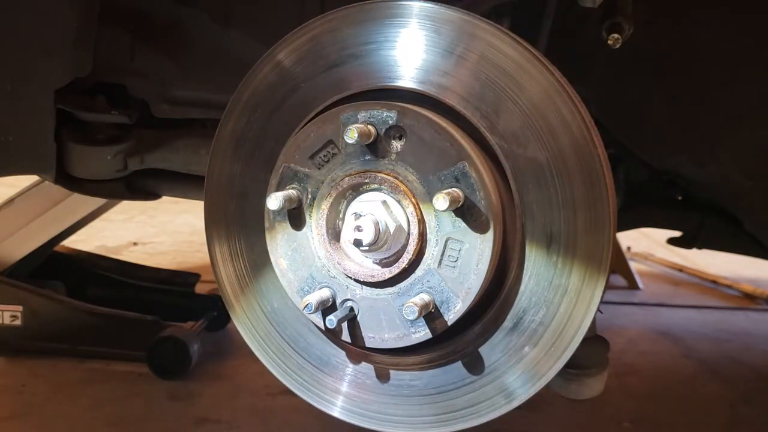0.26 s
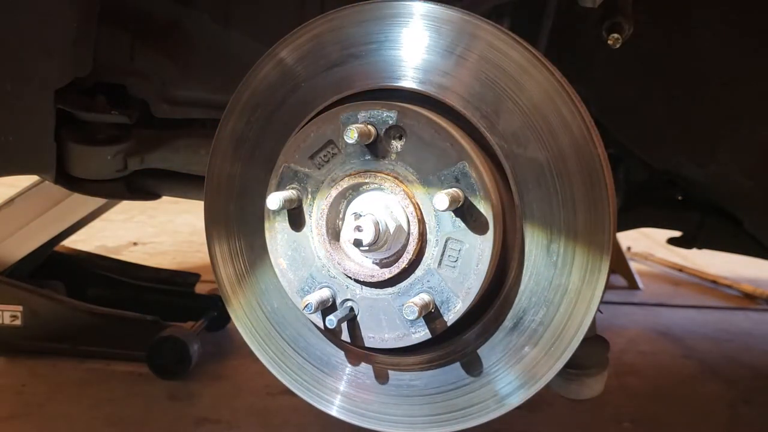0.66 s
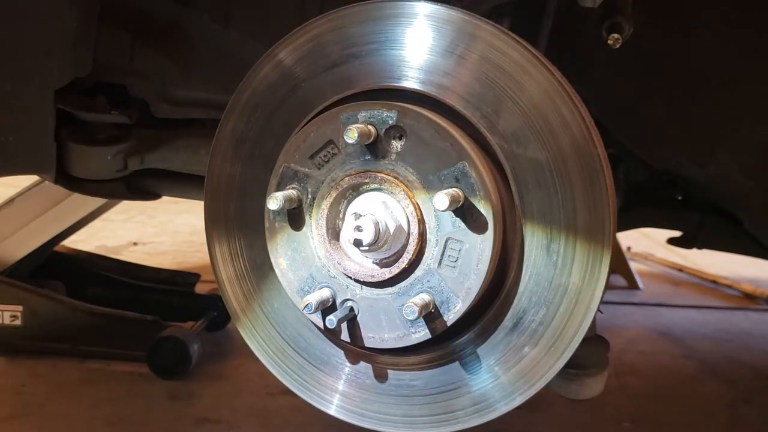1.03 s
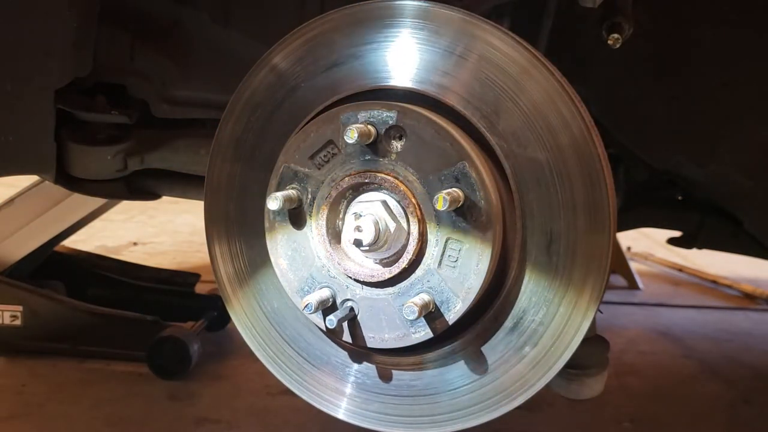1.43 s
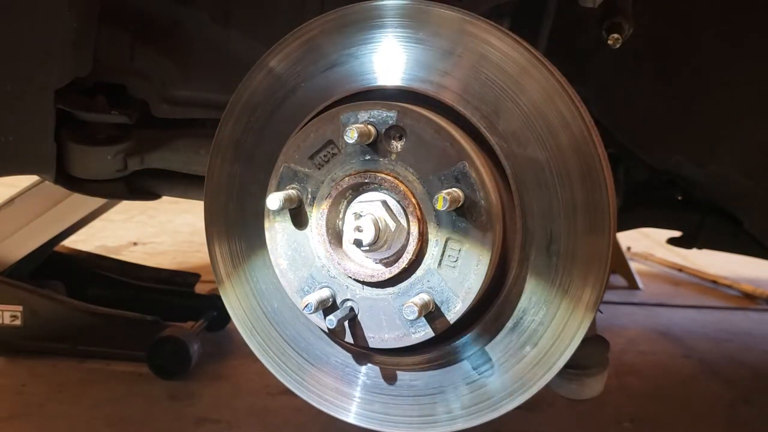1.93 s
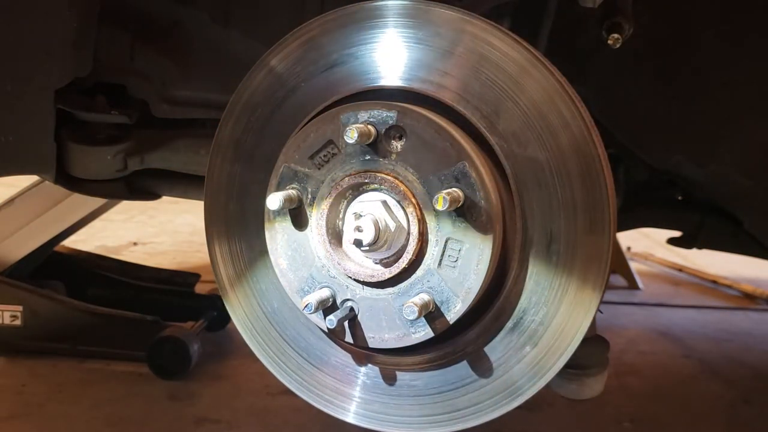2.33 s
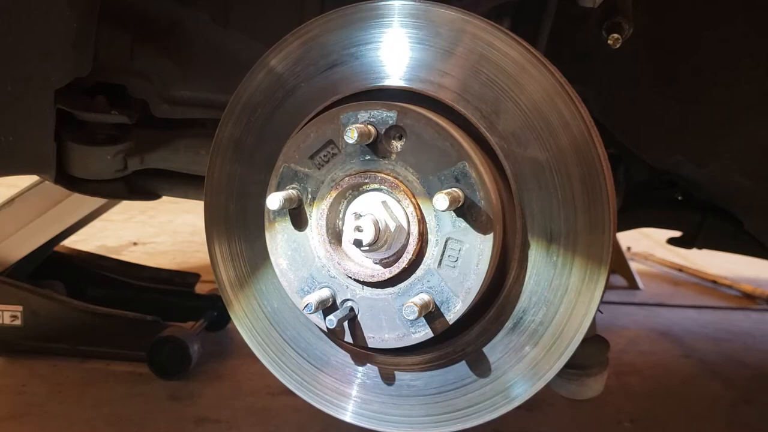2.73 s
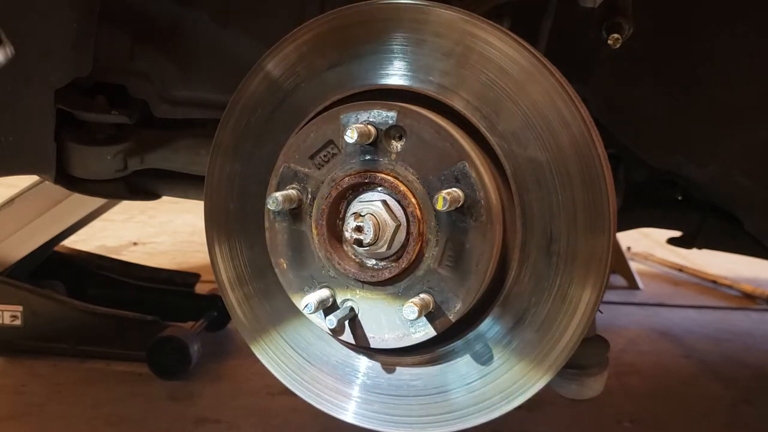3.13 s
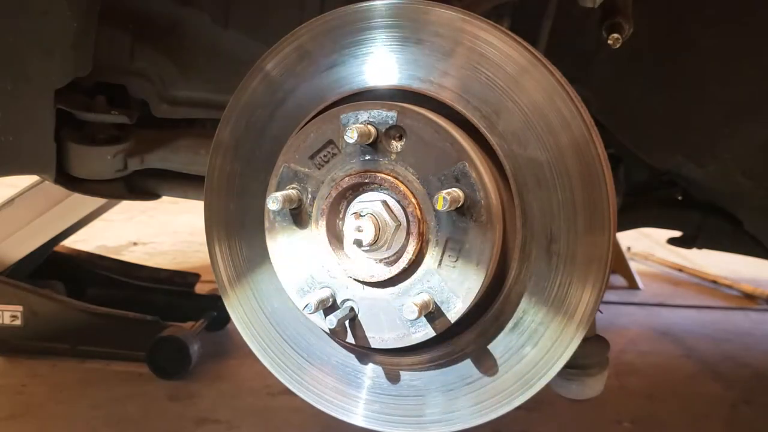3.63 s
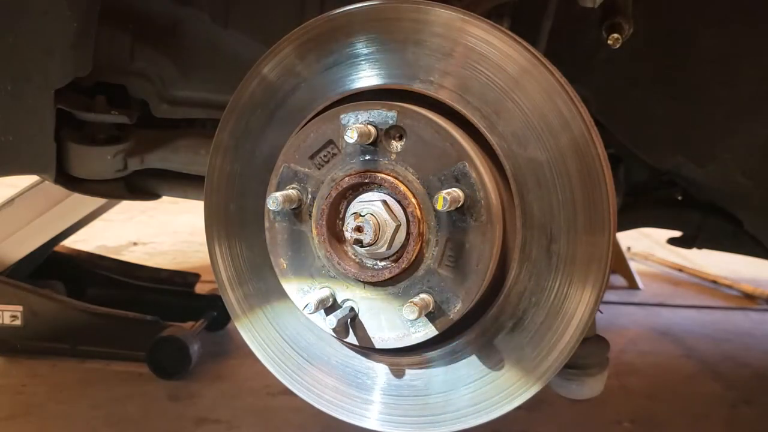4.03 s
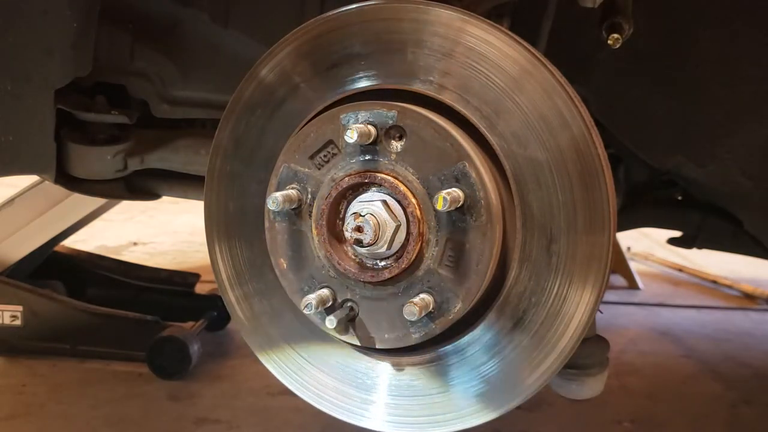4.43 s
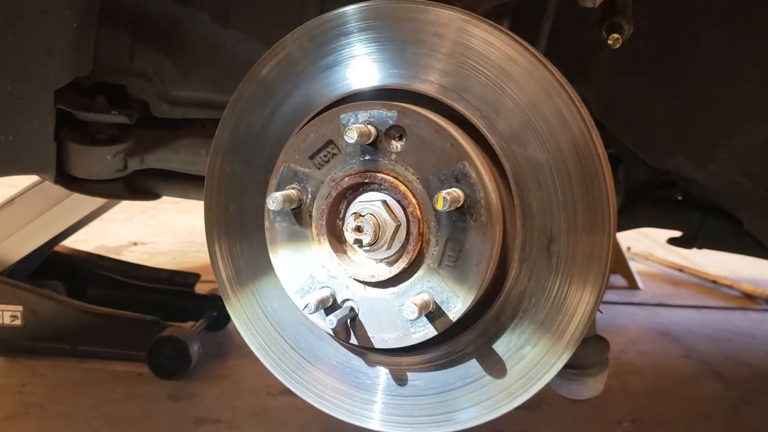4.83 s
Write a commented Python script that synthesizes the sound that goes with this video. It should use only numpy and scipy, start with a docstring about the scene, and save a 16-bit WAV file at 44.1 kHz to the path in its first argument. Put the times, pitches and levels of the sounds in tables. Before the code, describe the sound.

A steel hand tool is knocked on a concrete garage floor, twice early, then seven quick clattering blows, ringing over faint traffic.

```python
"""The ring of a blow just struck dies away over far traffic; then a steel hand tool is knocked on a concrete
garage floor, left of a camera. Every blow is a chatter of contacts, repeated once by a far wall: noisy bursts
of force drive the resonances of head, shank and slab, and the bare garage answers with diffuse noise and
standing waves. Sleeves rustle close on the left as grainy noise; a small steel part clinks once, in three
contacts; filtered noise and two wavering engine notes make the traffic."""
import sys
import numpy as np
from scipy import signal
from scipy.fft import rfft, irfft, next_fast_len
from scipy.io import wavfile
from scipy.ndimage import uniform_filter1d, map_coordinates

SR = 44100
rng = np.random.default_rng(int(sys.argv[2]) if len(sys.argv) > 2 else 0)


def dump_mix(stems):
    """Bounce the given channels to the path in sys.argv[1] as a 16-bit WAV at rate SR."""
    frames = np.atleast_2d(stems).T  # one column per channel
    limited = np.clip(frames, -1, 1)  # hard clip at full scale
    pcm = np.round(limited * 32767).astype(np.int16)
    wavfile.write(sys.argv[1], SR, pcm)


N = 223145
LEAD = 11025  # samples computed ahead of time zero, for the blow that is only heard ringing out

# Blows of the tool on the floor; the first falls before time zero. Each row: start in seconds, strength in dB;
# then in dB over the strength: graze just before, first touch, late rattle, knock of the slab, boom of the slab,
# clack of the shank, 13 kHz ring of the head; then left over right in dB, slap from the far wall in dB over the
# strength, time from first touch to full blow in seconds, push of the floor on the camera in dB before the
# share of each port.
BLOWS = [(-.16, -10.5, -46, -2, -3.5, -11, -11, -5.5, 1.5, 2, -2, .0035, -60),
         (1.357, -11, -38, -1, -6, -9, -10.5, -5.5, -1.5, 1.1, 0.5, 0.0038, -52),
         (1.668, -7.5, -45.5, -9.5, 0.5, -11, -12, -8.5, -21.5, 2.3, -2, .0022, -57),
         (3.3024, -5, -17, -3.5, 0, -12.5, -16, -9.5, -3, 3.37, 1, 0.0032, -44),
         (3.6144, -9, -40, -2.5, 2.5, -7.5, -12, -7, 1.5, 6.4, 2.5, .0034, -43),
         (3.874, -11, -40, -3, 3.5, -8, -11.5, -7, 4, 7.1, 4.5, 0.0034, -41),
         (4.114, -8, -34, -9.5, 1.5, -10, -13.5, -8.5, 1, 5.1, 0, .0024, -45),
         (4.3399, -7, -36, -3.5, 0.5, -9, -15.5, -10.5, -2.5, 2.6, -1, 0.0029, -41),
         (4.5712, -6.5, -49, -0.5, -0.5, -8.5, -15.5, -10.5, 1, 4, -11, .0038, -43.5),
         (4.807, -12.5, -40, -2, 6, -13, -15, -8.5, 0.5, 4.5, 8, 0.0027, -38)]


def amp(db):
    """Level is logarithmic: 20 dB is a factor of ten in amplitude."""
    return 10 ** (np.asarray(db) / 20)


def unit(x):
    """Normalisation by effective value: the signal is scaled to rms 1."""
    return x / np.sqrt(np.mean(x ** 2) + 1e-20)


def along(points, hz):
    """Spectra are drawn over logarithmic frequency: straight lines join the (Hz, value) points."""
    f, v = np.transpose(points)
    return np.interp(np.log(hz + 1), np.log(f + 1), v)


def curves(rows):
    """Slow change is piecewise linear in time: one curve for each column after the seconds."""
    s, *cols = np.transpose(rows)
    return [np.interp(np.arange(N) / SR, s, c) for c in cols]


def wobble(rate):
    """Band-limited fluctuation: a smooth curve through random knots, rate of them a second."""
    knots = rng.standard_normal(int(N * rate / SR) + 4)
    return map_coordinates(knots, [np.arange(N) * rate / SR])


def filtered(x, response):
    """Linear filtering: the spectrum of x is multiplied by a response of frequency in Hz."""
    m = next_fast_len(x.shape[-1] + 8192)
    spectrum = rfft(x, m) * response(np.fft.rfftfreq(m, 1 / SR))
    return irfft(spectrum, m)[..., :x.shape[-1]]


def pair(length, alike, spectrum=((1, 0),)):
    """Interchannel coherence: sum and difference of two noises, weighted by likeness; the pair has rms 1."""
    def gain(hz):
        turn = np.arccos(np.clip(along(alike, hz), -1, 1)) / 2
        return amp(along(spectrum, hz)) * [np.cos(turn), np.sin(turn)]

    mid, side = filtered(rng.standard_normal((2, length)), gain)
    return unit(np.array([mid + side, mid - side]))


def body(modes, bed):
    """Modal response: resonances on a broad noise bed, made minimum-phase by its cepstrum, with energy 1."""
    hz = np.fft.rfftfreq(8192, 1 / SR) + 1
    power = amp(2 * along(bed, hz))
    for centre_hz, width_hz, db in modes:
        power = power + amp(2 * db) / (1 + (2 * (hz - centre_hz) / width_hz) ** 2) ** 2
    cepstrum = irfft(np.log(power + 1e-12) / 2)
    cepstrum[1:4096] *= 2  # folding the later half onto the earlier makes the response causal
    cepstrum[4097:] = 0
    ring = irfft(np.exp(rfft(cepstrum)))[:4096]
    return ring / np.linalg.norm(ring)


def strike(times, levels_db, pans_db, t60, own):
    """Contact excitation: scraping noise bursts, partly shared; own is the share of power private to a port."""
    out, t = np.zeros((2, N + LEAD + 2048)), np.arange(2048) / SR
    later = 6  # samples by which the right port hears a contact after the left
    shape = amp(-60 * t / t60) * (1 - np.exp(-t / 0.0011))
    grit = rng.standard_normal((len(times), 3, len(t)))
    for s, db, pan_db, (shared, left, right) in zip(times, levels_db, pans_db, grit):
        burst = shape * (np.sqrt(1 - own) * shared + np.sqrt(own) * np.array([left, right]))
        burst *= np.linalg.norm(shape) / np.linalg.norm(burst, axis=1, keepdims=True)
        i = round(s * SR) + LEAD
        out[0, i:i + len(t) - later] += amp(db) * burst[0, :-later]
        out[1, i + later:i + len(t)] += amp(db - pan_db) * burst[1, :-later]
    return out[:, :N + LEAD]


def garage(force, near_db, far_db):
    """Diffuse reverberation: contact energy lingers as noise; near walls answer fast, the whole room slowly."""
    # Each row: frequency in Hz, decay time t60 in seconds.
    room_decay = [(60, 0.45), (160, 1), (420, 1), (1100, 1), (2900, 1), (6000, 0.84), (9000, 0.61),
                  (13000, 0.42), (15600, 0.35), (16000, .04)]
    # Each row: frequency in Hz, left-right likeness.
    echo_alike = [(60, 0.81), (180, 0.94), (550, 0.3), (1650, 0.25), (4970, -0.014), (15000, -0.24)]
    window, hop = 256, 64  # samples
    frames = dict(nperseg=window, noverlap=window - hop)
    hz, t, noise = signal.stft(pair(N + LEAD, echo_alike), SR, **frames)
    frame_of_sample = np.arange(N + LEAD) // hop + 1
    energy = np.bincount(frame_of_sample, force[0] ** 2, len(t))[None, :len(t)]

    near = amp(2 * near_db - 120 * t / 0.2) * (1 - np.exp(-(t / 0.015) ** 2))
    t60 = along(room_decay, hz)[:, None]
    far = amp(2 * far_db - 120 * t / t60) * (1 + 1.1 * np.exp(-t / 0.017))
    # most of the room answers only after a trip to the far wall
    arrival = 0.28 + 0.56 / (1 + np.exp(-(t - .03) / .003))
    lingering = np.abs(signal.fftconvolve(energy, near + far * arrival, axes=1)[:, :len(t)])

    # the diffuse tail is uneven: random smooth patches over time and frequency raise and lower it
    patches = uniform_filter1d(rng.standard_normal(lingering.shape), 2, 0)
    patches = unit(uniform_filter1d(patches, 60, 1))
    echo = noise * amp(1.8 * patches) * np.sqrt(lingering)
    return signal.istft(echo, SR, **frames)[1][:, :N + LEAD] * amp([[0], [-3.5]])


def sounded(force, ring, near_db=-36, far_db=-40):
    """Source-filter principle: force, direct and by way of the garage, convolved with the driven body."""
    heard = force + garage(force, near_db, far_db)
    return signal.fftconvolve(heard, ring[None], axes=1)[:, LEAD:LEAD + N]


def tool():
    """Impact of coupled bodies: each contact rings the head, clacks in the shank and thuds in the slab."""
    # Contacts of every blow: graze, first touch, full blow, three of rattle, slap back from the far wall.
    # Each row: strength, slab, shank, left over right, all in dB and added to those of the blow.
    contacts = np.array([(-7, 11.5, 7.5, 3), (1.5, 4, 2, 1), (2, -1.5, -1, 0), (-5.5, 3, 1, -3),
                         (-7.5, 5.5, 5.5, 6.5), (-12.5, 7, 7, 8), (-18, 3, 11, 4)])
    # One value per contact: seconds from the first touch (the first two) or from the full blow (the rest).
    delay_s = np.array([-.004, 0, 0, .0058, .0095, .014, .0333])
    # Resonances of the head, of its modes damped by the grip, of the shank, the knock and the boom of the slab.
    # Each row: centre in Hz, width in Hz, level in dB.
    head_modes, grip_modes = [(9040, 190, -22.5), (9700, 400, -22), (11000, 280, -6.5), (11100, 200, -8.5),
                              (13500, 370, -9.5), (14130, 300, -6), (15600, 260, -9)], [(12780, 150, -9), (12800, 240, -6), (12940, 160, -4.5)]
    shank_modes = [(2920, 750, -12.5), (4620, 530, -11), (5320, 680, -8), (5980, 480, -4), (6580, 1220, -4)]
    knock_modes, boom_modes = [(577, 8.3, -5.5), (664, 71, -5), (758, 25, -14), (792.6, 29, -10),
                               (879, 150, -8), (1065, 250, -12), (1302, 30, -9)], [(169, 36, -11.5), (242, 21, -12), (320.8, 72, -6),
                                                  (446, 45, -5.5), (433, 63, -7)]
    # Broad noise under those resonances. Each row: frequency in Hz, level in dB per Hz.
    head_bed, grip_bed = [(7500, -47), (8500, -28.5), (9500, -28.5), (11000, -9.5), (12000, -18.5),
                          (14000, -20.5), (15600, -10), (16000, -29), (16800, -40)], [(11000, -44), (12200, -16), (13600, -6.5), (14600, -47.5)]
    shank_bed = [(700, -39.5), (1300, -10), (2300, -10.5), (4000, -6), (6500, -7), (7600, -14.5),
                 (8500, -27), (9500, -35)]
    knock_bed, boom_bed = [(300, -47), (520, -18.5), (620, -11.5), (900, -8), (960, -16), (1500, -17.5),
                           (3000, -34)], [(40, -41.5), (120, -10), (300, -4.5), (480, -6),
                                                  (560, -10), (900, -45.5)]
    head_db = 0.5  # lower ring of the head over the strength
    scatter_s, scatter_db = .0006, 2  # no two rattles are alike

    (blow_s, blow_db, graze_db, touch_db, rattle_db, knock_db, boom_db, clack_db, ring_db,
     blow_pan_db, slap_db, lag_s, _) = np.array(BLOWS).T[:, :, None]
    step_db, slab_db, shank_db, step_pan_db = contacts.T
    kind = np.arange(len(contacts))
    rattling = (kind > 2) & (kind < 6)
    chance = rng.standard_normal((len(BLOWS), 2, len(contacts))) * rattling

    s = (blow_s + (kind > 1) * lag_s + delay_s + scatter_s * chance[:, 0]).ravel()
    manner_db = (kind == 0) * graze_db + (kind == 1) * touch_db + rattling * rattle_db + (kind == 6) * slap_db
    db = blow_db + step_db + manner_db + scatter_db * chance[:, 1]
    pan_db = (blow_pan_db + step_pan_db).ravel()

    def force(part_db, t60, own):
        return strike(s, (db + part_db).ravel(), pan_db, t60, own)

    low = sounded(force(head_db, 0.016, 1.0), body(head_modes, head_bed))
    high = sounded(force(ring_db, 0.016, 1.0), body(grip_modes, grip_bed))
    shank = sounded(force(clack_db + shank_db, 0.025, 0.34), body(shank_modes, shank_bed))
    knock = sounded(force(knock_db + slab_db, 0.0089, .05), body(knock_modes, knock_bed),
                    near_db=-34.0, far_db=-38.5)
    boom = sounded(force(boom_db + slab_db, 0.013, 0.069), body(boom_modes, boom_bed),
                   near_db=-48.5, far_db=-38.5)
    return low + high + shank + knock + boom


def standing_waves():
    """Room modes: each blow leaves a few steady, exponentially decaying low tones between the walls."""
    # Each row: frequency in Hz, level in dB relative to the set, decay time t60 in seconds.
    room_modes = [(218.2, -3.5, 0.78), (326, -2.5, 1.1), (344.3, -4.5, .8), (431, 0.5, 0.42),
                  (471.4, -2, 0.74), (613.4, -8.5, 1.2), (673, -4, 0.84), (714, -5, 0.7), (760, 1, 0.92),
                  (788, -6, 0.86), (877, -5, 0.23)]
    set_db, build_s = -28.5, .01  # the set over the knock of the slab; time to build up
    out, t = np.zeros(N + LEAD + SR), np.arange(SR) / SR
    hz, mode_db, t60 = np.array(room_modes).T[:, :, None]
    chance = rng.standard_normal((len(BLOWS), 2, len(room_modes), 1))
    for (s, db, _, _, _, knock_db, *_), (size, phase) in zip(BLOWS, chance):
        decay = amp(mode_db + 2.0 * size - 60 * t / t60)
        tones = (decay * np.sin(2 * np.pi * (hz * t + phase))).sum(axis=0)
        start = round(s * SR) + LEAD
        out[start:start + SR] += amp(db + knock_db + set_db) * (1 - np.exp(-t / build_s)) * tones
    return out[LEAD:LEAD + N] * amp([[0], [-4]])


def engine(rows, fading_db):
    """Frequency and amplitude modulation: a far engine note, unsteady and fading in and out."""
    hz, db = curves(rows)
    phase = 2 * np.pi * np.cumsum(hz + 1.5 * wobble(5)) / SR
    return np.sqrt(2) * amp(db + fading_db * wobble(8)) * np.sin(phase)


def background():
    """Superposition of far sources: swelling traffic noise, two engine notes and the microphone's hiss."""
    # Swell of the traffic. Each row: time in seconds, level in dB before the left-right balance.
    traffic_swell = [(0, -61.5), (.5, -63), (1.7, -64), (2.45, -61.5), (3.7, -64), (5.06, -69)]
    # Spectra of drone and hiss. Each row: frequency in Hz, relative level in dB per Hz.
    drone_spectrum, hiss_spectrum = [(13, -60), (22, -25.5), (46, -5.5), (65, -5), (80, -4.5), (98, -14),
                                     (140, -15.5), (157, -17), (178, -17.5), (204, -21), (262, -25),
                                     (326, -32.5), (600, -46.5), (780, -69.5), (1320, -120)], [(180, -22.5), (300, -4), (537, -14.5), (978, -16),
                                                    (1080, -18), (1530, -16), (4590, -23.5), (6410, -19),
                                                    (8360, -36.5), (15000, -17), (16000, -31.5)]
    # Each row: frequency in Hz, left-right likeness.
    drone_alike = [(60, 1), (240, 0.27), (950, -0.02), (3770, 0.05), (15000, 0.04)]
    # A far engine note and a deeper one.
    # Each row: time in seconds, mean frequency in Hz, mean level in dB before the left-right balance.
    high_note, deep_note = [(0, 186.3, -58.5), (.15, 183, -71), (.21, 181.5, -59), (.5, 180, -67.5),
                            (.65, 178.6, -74), (.8, 176.5, -66), (1.3, 174, -77), (2.1, 173.1, -77),
                            (2.18, 172, -67), (2.9, 172.6, -66.5), (3.28, 170, -86.5)], [(0, 65.1, -75), (.5, 65.56, -56), (.95, 64.53, -60),
                                         (1.3, 66.6, -63.5), (2.2, 66.93, -71.5), (2.5, 64.5, -60),
                                         (3.2, 64, -64), (5.06, 64, -68.5)]
    drone = amp(curves(traffic_swell)[0]) * pair(N, drone_alike, drone_spectrum)
    hiss = amp(-76.5) * pair(N, [(1, 0.027)], hiss_spectrum)
    engines = engine(high_note, fading_db=0.5) + engine(deep_note, fading_db=0.3)
    return (drone + engines) * amp([[1.5], [-1.5]]) + hiss * amp([[3], [-6]])


def sleeves():
    """Friction noise: cloth hiss modulated in fine grains, with a few small ticks, mostly at the left port."""
    # Sleeve movements. Each row: time of the peak in seconds, half length in seconds, peak level in dB.
    rustles = [(0.561, .006, -61.5), (0.739, 0.095, -70.5), (0.966, 0.065, -68), (1.04, .02, -59.5),
               (1.129, .06, -69), (1.261, .07, -60.5), (2.737, 0.069, -56.5), (2.882, 0.031, -61.5),
               (2.955, 0.029, -70), (3.224, 0.062, -66)]
    # Small ticks. Each row: start in seconds, level in dB before rise and decay, centre in Hz, width in Hz.
    ticks = [(.56, -79, 5280, 5560), (.934, -57.5, 2614, 1300), (2.248, -52.5, 980, 800),
             (2.706, -52, 1910, 1500)]
    # Each row: frequency in Hz, relative level in dB per Hz.
    cloth_spectrum = [(240, -23), (400, -3.5), (879, -7), (1160, -10.5), (1600, -8.5), (3690, -2.5),
                      (4310, -2.5), (6640, 0), (8370, -17), (14800, 4), (16000, -5.5)]
    grain = amp(0.94 * wobble(150) + 1.4 * wobble(36))
    now = np.arange(N) / SR
    motion = sum(amp(db) * np.exp(-np.abs((now - s) / half_s) ** 1.7) for s, half_s, db in rustles)
    cloth = motion * unit(grain * pair(N, [(1, .1)], cloth_spectrum))

    t = np.arange(1500) / SR
    for s, db, hz, width_hz in ticks:
        band = filtered(rng.standard_normal(len(t)), lambda f: 1 / (1 + (2 * (f - hz) / width_hz) ** 2) ** 2)
        shape = amp(db - 60 * t / 0.034) * (1 - np.exp(-t / 0.0019))
        start = round(s * SR)
        cloth[:, start:start + len(t)] += shape * unit(band)
    return cloth * amp([[0], [-13]])


def pushes():
    """Structure-borne motion: one soft 50 Hz swing of the camera per blow, mostly at the left port."""
    push_after_s = .021  # centre of the swing after the start of the blow
    t = np.arange(N) / SR - push_after_s
    swing = np.zeros(N)
    for s, *_, push_db in BLOWS:
        swing += amp(push_db) * np.exp(-((t - s) / .014) ** 2) * np.sin(2 * np.pi * 50 * (t - s))
    return swing * np.array([[1.6], [.15]])


def part():
    """Damped resonance: contacts of the small part set off its few broad modes."""
    # Each row: time of the contact in seconds, strength in dB.
    clinks = [(2.4327, -14), (2.436, -20.5), (2.4382, -18.5)]
    # Each row: centre in Hz, width in Hz, level in dB.
    part_modes = [(1770, 310, -19.5), (2860, 230, -6.5), (3140, 200, -1.5), (3530, 330, 2.5),
                  (3660, 460, -1), (5800, 540, -10), (6850, 360, -3.5), (11080, 440, -0.5),
                  (15300, 320, -9.5)]
    # Broad noise under the resonances. Each row: frequency in Hz, level in dB per Hz.
    part_bed = [(150, -30.5), (600, -29.5), (2000, -27.5), (4500, -12), (7500, -13.5), (8800, -35),
                (12500, -21), (15700, -14), (16800, -48.5)]
    s, db = np.transpose(clinks)
    force = strike(s, db, np.full(len(s), 9.), 0.034, 0.49)
    return sounded(force, body(part_modes, part_bed), near_db=-43, far_db=-48.0)


def scene():
    """Linear superposition: everything that reaches the two microphone ports is summed."""
    return tool() + standing_waves() + background() + sleeves() + pushes() + part()


def record(dry):
    """Saturation and band limiting: the camera rounds off the highest peaks and cuts above 16.6 kHz."""
    soft = dry / (1 + np.abs(dry) ** 6) ** (1 / 6)
    return filtered(soft, lambda hz: 1 / (1 + (hz / 16600) ** 200))


dry = scene()
out = record(dry)
dump_mix(out)
```